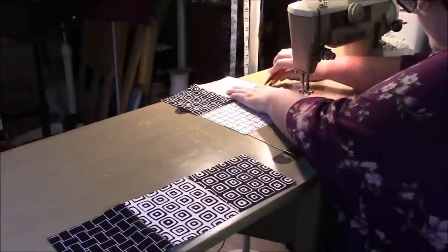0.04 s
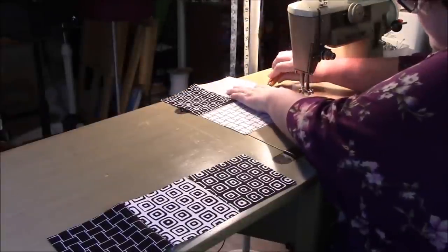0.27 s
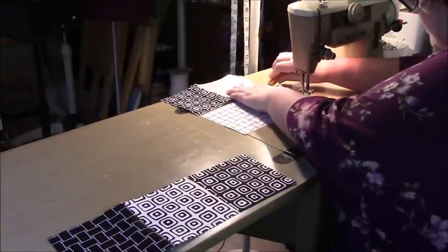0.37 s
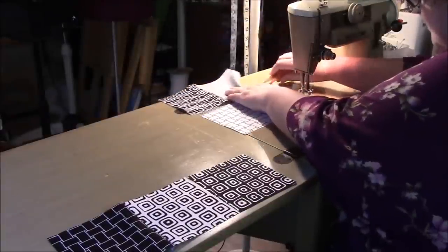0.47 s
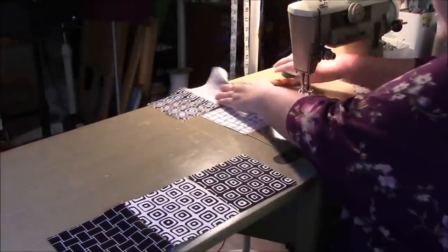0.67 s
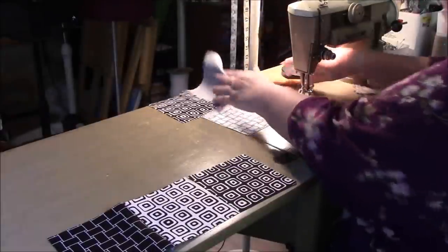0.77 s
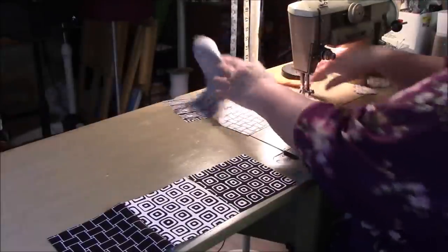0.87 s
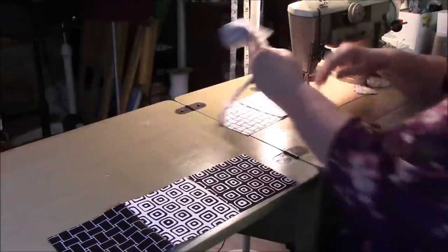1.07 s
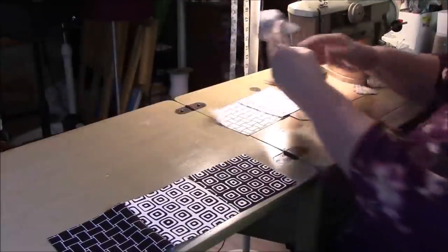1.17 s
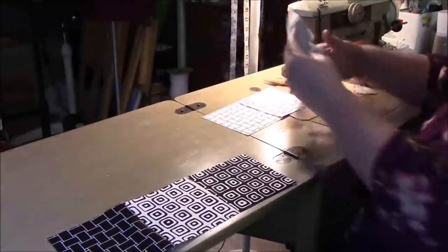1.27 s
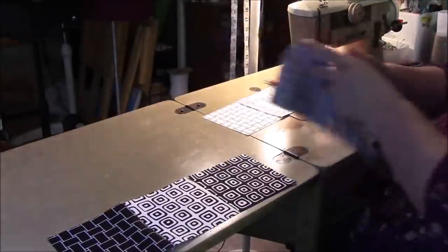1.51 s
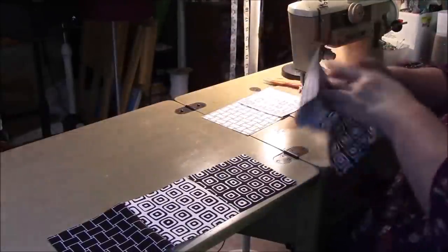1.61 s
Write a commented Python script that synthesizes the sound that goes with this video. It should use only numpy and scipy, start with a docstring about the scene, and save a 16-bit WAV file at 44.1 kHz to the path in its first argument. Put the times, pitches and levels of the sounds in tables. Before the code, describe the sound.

A stopped sewing machine clacks three times, the last running into a brief rattling whirr.

```python
"""Clacks of a sewing machine at rest

The levers of the thread trimmer and presser foot clack three times; the last clack runs into a short
rattling whirr and a few light ticks. Impacts and sliding friction excite the resonances of the machine
and its table, and a small room reverberates. A motor idles softly, and cloth rustles at the end."""
import sys
import numpy as np
from scipy import signal
from scipy.fft import rfft, irfft, next_fast_len
from scipy.io import wavfile
from scipy.ndimage import uniform_filter1d

SR = 44100
rng = np.random.default_rng(int(sys.argv[2]) if len(sys.argv) > 2 else 0)


def master_out(mix):
    """Clip the mix to full scale and print it as 16-bit PCM to the path in sys.argv[1]."""
    frames = np.transpose(np.atleast_2d(mix))
    ceiling = np.clip(frames, -1, 1)
    pcm = np.round(ceiling * 32767).astype(np.int16)
    wavfile.write(sys.argv[1], SR, pcm)


N = 72765
T = np.arange(N) / SR


def amp(db):
    return 10 ** (np.asarray(db) / 20)


def unit(x):
    return x / np.sqrt(np.mean(x ** 2) + 1e-20)


def along(points, hz):
    """Interpolation on a logarithmic frequency axis."""
    f, values = np.transpose(points)
    return np.interp(np.log(hz + 1), np.log(f + 1), values)


def curves(rows):
    """Linear envelopes, one per column; the first is silent outside the table."""
    s, level, *cols = np.transpose(rows)
    return [np.interp(T, s, level, left=-120, right=-120)] + [np.interp(T, s, c) for c in cols]


def filtered(x, response):
    """Linear filtering: the spectrum is multiplied by a frequency response."""
    size = next_fast_len(N + SR // 2)
    return irfft(rfft(x, size) * response(np.fft.rfftfreq(size, 1 / SR)), size)[:N]


def ring(x, modes, relative_band=0.82):
    """Modal superposition: resonances of alternating sign, band-passed, with unit mean power gain."""
    def response(f):
        peak = lambda hz, width: 1j * f * width / (hz * hz - f * f + 1j * f * width)
        middle = np.sqrt(modes[0][0] * modes[-1][0])
        h = sum((-1) ** k * amp(db) * peak(hz, width) for k, (hz, width, db) in enumerate(modes))
        h *= peak(middle, relative_band * middle) ** 2
        return h / np.sqrt(np.mean(np.abs(h) ** 2))
    return filtered(x, response)


def rush(spectrum, patchy_db):
    """Random modulation: coloured noise of unit rms whose gain wanders over time and frequency."""
    cells = signal.stft(rng.standard_normal(N + 512), nperseg=512)[2]
    patches = uniform_filter1d(rng.standard_normal(cells.shape), size=4, axis=0)
    patches = uniform_filter1d(patches, size=6, axis=1)
    noise = signal.istft(cells * amp(patchy_db * unit(patches)), nperseg=512)[1][:N]
    return unit(filtered(noise, lambda hz: amp(along(spectrum, hz))))


IDLE_SPECTRUM = [(20, -29), (96, -26), (222, -4.5), (337, -8), (460, 2.7), (560, -7.5), (630, -3),
                 (800, -6.5), (1030, -6), (1300, -8.5), (1600, -7), (2100, -13.5), (4060, -23), (5680, -28),
                 (12400, -41), (16000, -57)]  # motor and air noise (frequency [Hz], relative density [dB])
IDLE_ENVELOPE = [(0, -48), (.3, -47.5), (1, -50), (1.65, -50)]  # its strength (time [s], level [dB])
def idle():
    """Broadband noise of the motor and room air, with a faint narrowband electrical whine."""
    level, = curves(IDLE_ENVELOPE)
    whine = ring(rng.standard_normal(N), [(15730, 58, 0)])
    return amp(level) * rush(IDLE_SPECTRUM, patchy_db=1.97) + amp(-84) * whine


CLOTH_SPECTRUM = [(1500, -22.5), (3000, -1), (5000, -6.5), (10000, -6), (15000, -23)]  # rubbing fabric (frequency [Hz], relative density [dB])
CLOTH_ENVELOPE = [(1.42, -86), (1.5, -73.5), (1.53, -69.5), (1.6, -61), (1.65, -77)]  # its swell (time [s], level [dB])
def cloth():
    """Friction noise of fabric gathered up in the hands."""
    level, = curves(CLOTH_ENVELOPE)
    return amp(level) * rush(CLOTH_SPECTRUM, patchy_db=-0.5)


ROOM_DECAY = [(200, 0.63), (500, 0.32), (1500, 0.3), (4000, 0.37), (10000, 0.2), (15000, 0.12)]  # reverberation time (frequency [Hz], T60 [s])
def room(x, delay_s=0.0045, step_s=0.15):
    """Reverberation: each frequency decays at its own rate, in random tails that slowly crossfade."""
    out = np.zeros(N)
    for centre_s in np.arange(0, T[-1] + step_s, step_s):
        hz, t, cells = signal.stft(rng.standard_normal(SR // 2), SR, nperseg=256)
        decay = amp(-60 * t / along(ROOM_DECAY, hz)[:, None])
        tail = signal.istft(cells * decay, SR, nperseg=256)[1]
        tail = np.pad(tail / np.linalg.norm(tail), (round(delay_s * SR), 0))
        fade = np.cos(np.pi / 2 * np.clip((T - centre_s) / step_s, -1, 1))
        out += signal.fftconvolve(x * fade, tail)[:N]
    return amp(-5.5) * out


def whirr(ticks, sliding_share=0.64):
    """Incoherent addition: tiny knocks are mixed by power with the noise of sliding friction."""
    return np.sqrt(1 - sliding_share) * unit(ticks) + np.sqrt(sliding_share) * rng.standard_normal(N)


# Metal contacts (time [s], relative level [dB], offsets for table, housing, arm, plate, ping [dB])
IMPACTS = [(.0563, -63.5, 12, 6, 22, -17, -26), (0.0743, -47, -19, -11, 14.5, -14, -8),
           (0.0868, -53, -11, -6, 16, -16, -17), (.1077, -52, 16.5, 2, 13, -7, -25),
           (.1254, -51.5, -19, -8, 1, -21, -1), (.1344, -49, -1, 11.5, 11, -23, -25),
           (.1414, -58, 26.5, -7, -6, -16, -22), (.2084, -38.5, 18, 12, 14.5, -8, -16),
           (.2172, -18, 0.5, 2.5, 3, 2, 1.5), (.2244, -22.5, -20, 0, -19, -31, -28),
           (.2304, -24.5, -6.5, -9.5, -10, -4, -25), (0.4089, -22.5, 1.5, 0.5, 1, -9, -20),
           (.4164, -28.5, 1.5, 0, 3, -29, -1), (.4215, -28, -8, -1.5, -15, -6, -14),
           (.4294, -25, 0.5, -1.5, -28, -16, -4), (.4594, -33, -16, 1.5, -6, -3.5, -1.5),
           (.539, -19.5, 2, 12, -12, -24, -10), (.5432, -15.5, 0.5, 2, -26, 0, -11),
           (.5482, -17, 5.5, -8, 2.5, -25, -11.5), (0.5557, -19, 2, -7, -5, -1, -28),
           (.5671, -23.5, 2.5, 8.5, -32, -26, -14), (.5824, -32, 8.5, -6, -24, -10, -7),
           (.6035, -23, -3, -2.5, -10, -26, -5.5), (.6114, -24, 0, 6, -25, -19, -25),
           (.6285, -20.5, 4, -8, -23.5, -5.5, -3.5), (.6469, -17.5, -29, -7, 0, -33, -21),
           (.6624, -25, -5, -27, -26, -12, -16), (.6734, -20.5, -38, -29.5, -29, -34, -2.5),
           (.7044, -31, 15, -32, -26, -25, -17.5), (.7233, -35.5, 1, -3, -20, -21, -4),
           (.7814, -38, 2, -14, 0.5, -4, -25), (.847, -27.5, -12, -11, -8.5, -8, -14),
           (.8584, -32.5, -28, -19, -5, -24, -12), (.8973, -36.5, -26, -7.5, -2, -3, -11),
           (.9064, -40, 11, -21, -13.5, -10, -31.5), (.9424, -48, 12, 4.5, -28, -16, -8)]
# One entry per part: bed, table, cover, housing, arm, clack, plate, ping
IMPACT_COUPLING = [-24, -13.5, -19, -14, -14, -8, -5.5, -6.5]  # (gain [dB])
CHATTER_DECAY = [0.035, 0.02, 0.0081, 0.011, 0.012, 0.036, 0.04, 0.031]  # (T60 [s])
FIRST_TOUCH = [3, 7, 3, 7, 5, 3, 2, 2]  # (weight of the impulse against the chatter [1])
def impacts(part, rise_s=0.00061):
    """Impact excitation of one part: each contact is an impulse and exponentially decaying chatter."""
    t, out = T[:SR // 10], np.zeros(N + SR)
    envelope = amp(-60 * t / CHATTER_DECAY[part]) * (1 - np.exp(-t / rise_s))
    for s, db, table, housing, arm, plate, ping in IMPACTS:
        offset_db = [table, table, housing, housing, arm, 0, plate, ping][part]
        force = envelope * rng.standard_normal(len(t))
        force[round(rise_s * SR)] = FIRST_TOUCH[part] * np.sqrt(CHATTER_DECAY[part] * SR / 50)
        out[round(s * SR):][:len(t)] += amp(db + offset_db + IMPACT_COUPLING[part]) * force
    return out[:N]


# Resonances of the parts (frequency [Hz], bandwidth [Hz], relative gain [dB])
BED_MODES = [(270.4, 61.5, -3.5), (330, 70, -1)]
TABLE_MODES = [(451, 47.6, 4), (508.8, 30.2, 5), (595, 50, -7), (984, 39, -4.5)]
COVER_MODES = [(853, 140, 1), (1273, 110, -0.5)]
HOUSING_MODES = [(1477, 160, -1.5), (1680, 180, 0), (1910, 264, 0.5)]
ARM_MODES = [(2240, 220, -2.5), (2654, 140, -1.5)]
CLACK_MODES = [(3437, 665, 0), (3810, 180, 3), (4180, 410, -5)]
PLATE_MODES = [(5066, 1150, 7), (7500, 530, -10.5)]
PING_MODES = [(8100, 590, 1), (9400, 460, -2.5), (10500, 1000, -1.5), (13100, 1260, -8),
              (14250, 2100, -13.5)]
# Course of the whirr (time [s], relative level [dB], offsets for bed, table, housing, ping [dB])
WHIRR_ENVELOPE = [(.55, -16, -25, -3.5, -6.5, -11.5), (.58, -29, -9, -14, 6, -11.5),
                  (.602, -26, -11, -11, -1, -8), (.626, -28.5, -24, 12.5, 3.5, -4.5),
                  (.665, -26, 3.5, -2, -19, -3.5), (.7, -27.5, -5.5, -5, -18, -7.5),
                  (.736, -27, 2, 5, -7, -5), (.802, -46, 3.5, -16, 4.5, -10),
                  (.838, -60, 8.5, -9, 12, -6.5), (.85, -35, -15, -13.5, -10, -3.5),
                  (.936, -58, 11, 24.5, 13, -15), (1.02, -96, -6, 14, -3, -25)]
WHIRR_COUPLING = [-12, -10, -11.5, -10.5, -18, -6, -14.5, -5.5]  # one entry per part (gain [dB])
def machine(ticks_per_s=370, tick_spread_db=5):
    """Forced vibration: impacts and whirr drive the body, table, levers and small steel parts."""
    level, bed, table, housing, ping = curves(WHIRR_ENVELOPE)
    parts = [(BED_MODES, bed), (TABLE_MODES, table), (COVER_MODES, housing), (HOUSING_MODES, housing),
             (ARM_MODES, 0), (CLACK_MODES, 0), (PLATE_MODES, 0), (PING_MODES, ping)]
    ticks = (rng.random(N) < ticks_per_s / SR) * amp(tick_spread_db * rng.standard_normal(N))
    out = np.zeros(N)
    for part, (modes, offset_db) in enumerate(parts):
        rattle = amp(level + offset_db + WHIRR_COUPLING[part]) * whirr(ticks)
        out += ring(impacts(part) + rattle, modes)
    return out


def scene():
    """Superposition of the machine, its reverberation and the background."""
    direct = machine()
    return (direct + room(direct) + idle() + cloth())[None]


MIC_RESPONSE = [(60, 0.5), (150, 0), (250, -0.64), (15800, -2), (15900, -15.5)]  # microphone colour (frequency [Hz], gain [dB])
def record(dry, top_hz=16435):
    """Band limiting: the microphone colours the sound and passes nothing above top_hz."""
    return filtered(dry[0], lambda hz: amp(along(MIC_RESPONSE, hz)) * (hz < top_hz))[None]


dry = scene()
out = record(dry)
master_out(out)
```